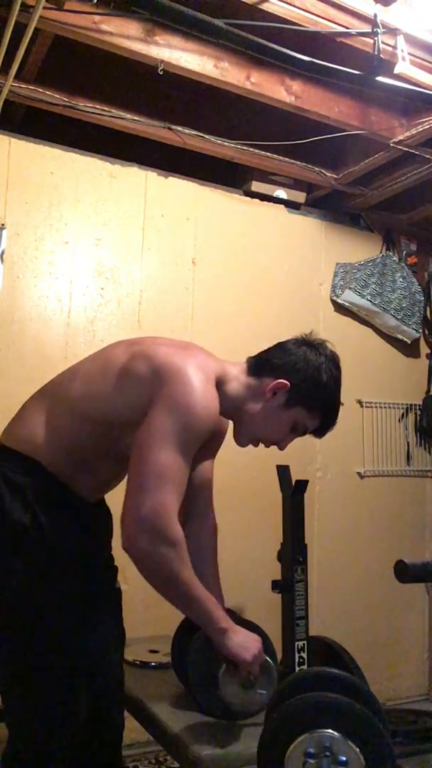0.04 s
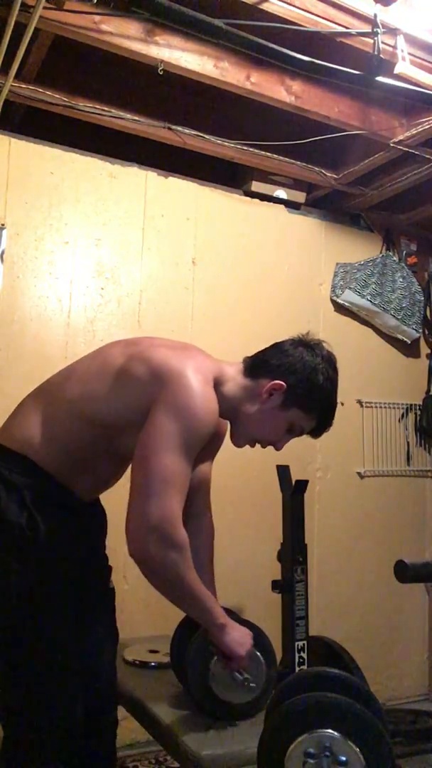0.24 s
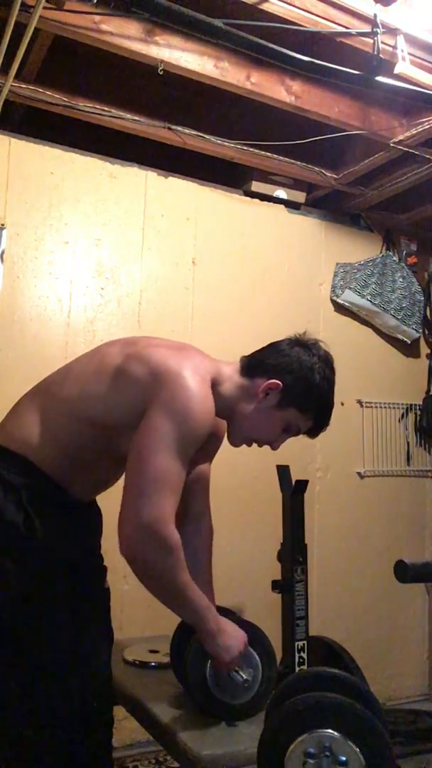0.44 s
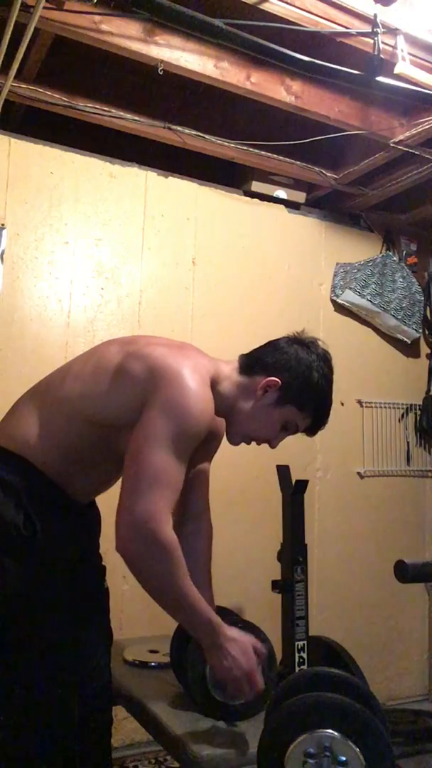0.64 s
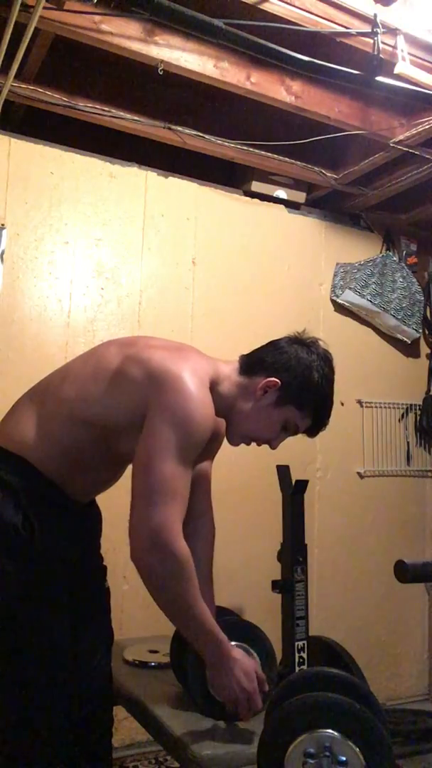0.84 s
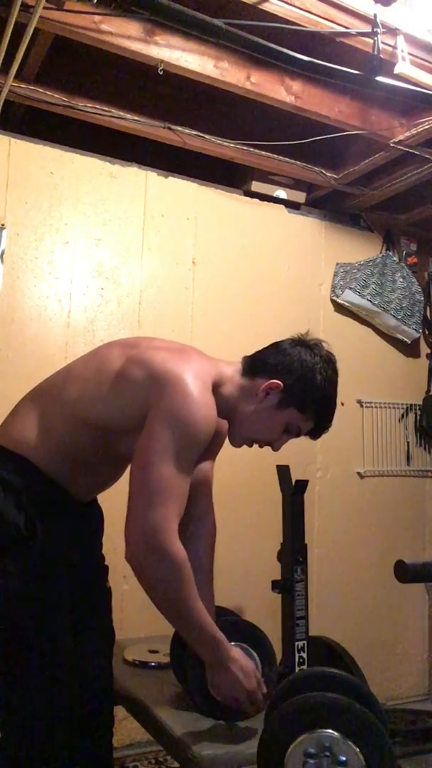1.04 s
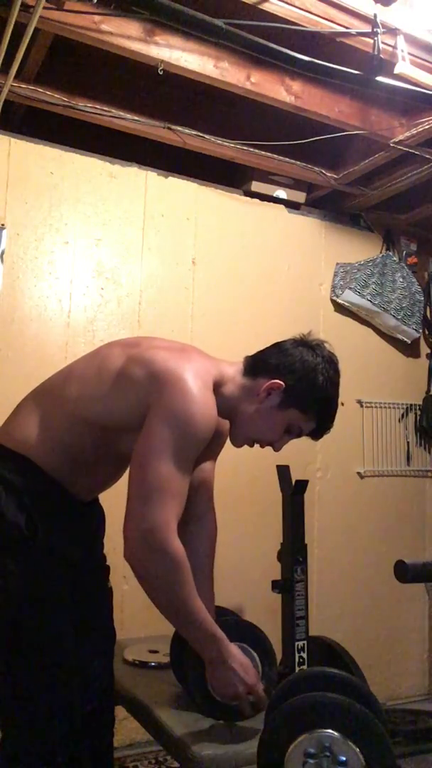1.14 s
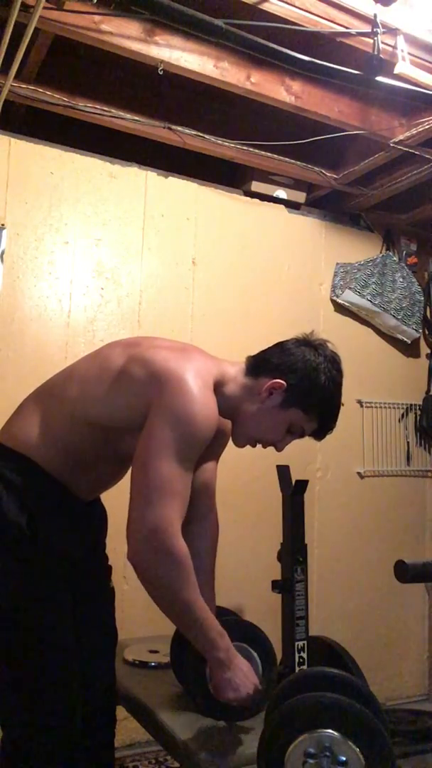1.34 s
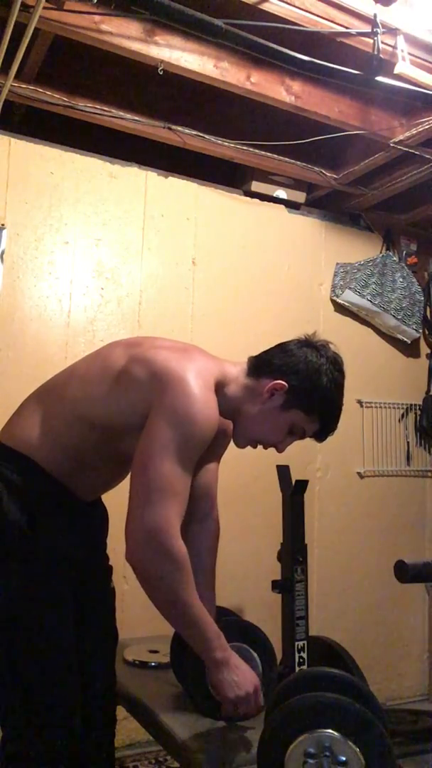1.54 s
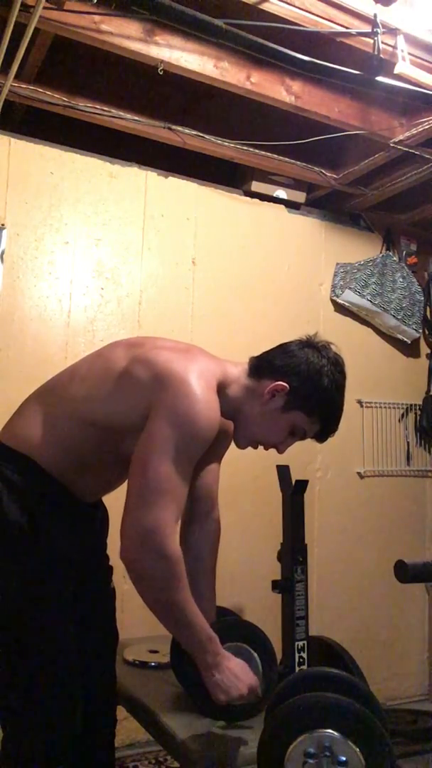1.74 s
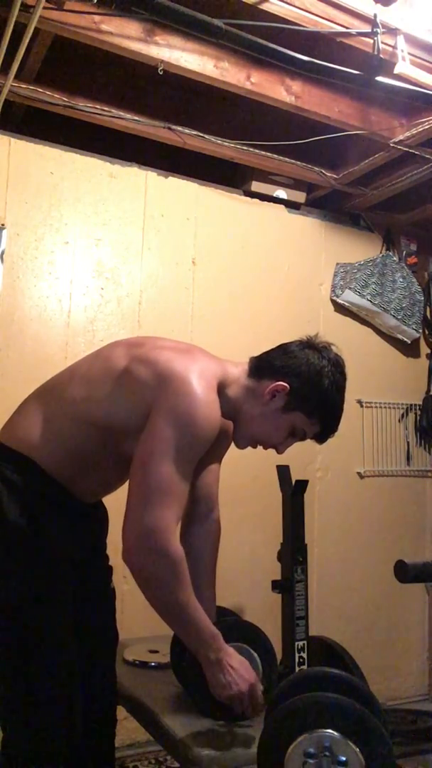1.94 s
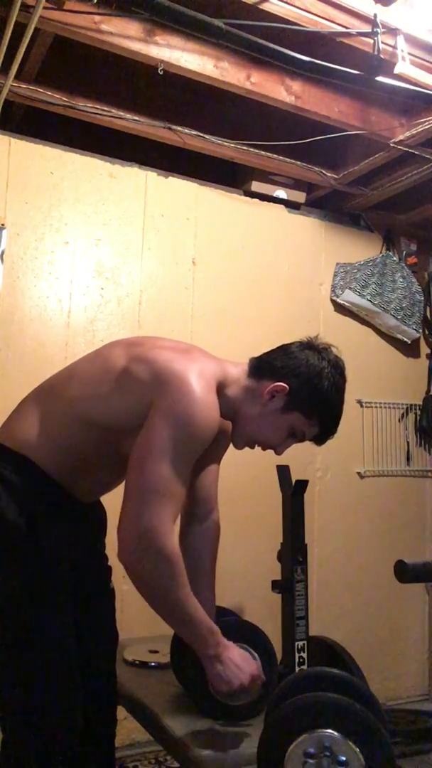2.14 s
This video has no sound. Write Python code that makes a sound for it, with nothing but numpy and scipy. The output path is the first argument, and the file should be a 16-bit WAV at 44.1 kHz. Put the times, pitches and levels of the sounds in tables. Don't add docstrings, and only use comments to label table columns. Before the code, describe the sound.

Metal plate clanking against other plates on a dumbbell, followed by faint collar ticks and scraping

```python
import sys
import numpy as np
from scipy import signal
from scipy.fft import rfft, irfft
from scipy.io import wavfile
from scipy.ndimage import uniform_filter1d, map_coordinates

SR = 44100
rng = np.random.default_rng(int(sys.argv[2]) if len(sys.argv) > 2 else 0)


def voltage_ratio(level):
    return 10 ** (np.asarray(level, float) / 20)


def generate_wav(sig):
    pcm = np.round(np.clip(np.atleast_2d(sig).T, -1, 1) * 32767).astype(np.int16)
    wavfile.write(sys.argv[1], SR, pcm)


N = 97020

# start in seconds, ring in dB, knock in dB, brightness in dB per octave.
GRIPPED_HITS = [
    (0.0657, -66, -55, -46),
    (0.1256, -58, -50.5, 0.5),
    (0.1412, -69, -40.5, -3.8),
    (0.167, -48, -42, -8.7),
    (.18, -41, -49, -5),
    (0.1995, -23.5, -21, -1.66),
    (0.299, -31.5, -20.5, -0.5),
    (0.343, -42, -37, -3.4),
    (0.384, -34.5, -48, 0.7),
]
# start in seconds, ring in dB, knock in dB, brightness in dB per octave.
FREE_HITS = [(.3945, -25, -12.5, -1), (.412, -20.5, -35.5, -8), (.432, -34, -22, 0.7),
             (.442, -25.5, -22, 4.2), (.4474, -19, -37.5, -3), (.462, -26, -32.5, 0), (.4908, -22, -51, -4),
             (.512, -31, -35.5, 3.1), (.519, -22.5, -13.5, 4.5), (.5277, -8.5, -21.5, -0.4),
             (.55, -30, -38.5, 9.6), (.5845, -18, -19.5, -2.2), (.6, -27.5, -44, -7.5),
             (.622, -25, -24.5, 1.8)]
# start in seconds, ring in dB, knock in dB, brightness in dB per octave.
COLLAR_HITS = [(.9133, -26.5, -28, 1), (1.1071, -74, -40.5, -13), (1.1683, -37, -32, 1.6),
               (1.197, -43, -33, -3.2), (1.217, -45, -40.5, -4.5), (1.3791, -60.5, -53.5, -6),
               (1.507, -52, -44, 2.5), (1.518, -39, -35.5, -0.5), (1.751, -50, -43, -7),
               (1.763, -40, -31, -1.5), (1.8113, -36.5, -32, -3.5), (1.8313, -41, -33, -2),
               (1.847, -44, -40.5, -14), (1.9095, -63.5, -38, -5), (1.992, -54, -39.5, -2),
               (2.012, -47, -39.5, -3.5), (2.073, -74, -54.5, .1), (2.1127, -30, -28, -1.5),
               (2.165, -33, -30.5, -1), (2.197, -34, -32.5, -10.7)]

# frequency in Hz, level in dB, t60 in seconds.
GRIPPED_MODES = [(2930, -5.5, 0.044), (3680, -10, .1), (4064, -18.5, 0.09), (4400, -10, 0.049),
                 (5862, -4.5, 0.18), (6940, -16, 0.076), (8495, -23, 0.031), (9440, -25.5, 0.071),
                 (11660, -35, 0.077), (11330, -27.5, .12), (11750, -24, 0.11)]
FREE_MODE_HZ = [1925, 3073, 3540, 3640, 3652, 4393, 5860, 5915, 6600, 8492, 10900, 11700, 14150, 15350]
# level in dB, t60 in seconds.
FREE_MODE_RING = [(-10.5, 0.34), (-14, 0.27), (-12, 0.012), (-2, 0.058), (-13.5, .3), (-23.5, .25),
                  (-18, 0.13), (-20.5, 0.17), (-27.5, 0.086), (-20.5, 0.073), (-41.5, 0.051), (-35, 0.051),
                  (-36.5, 0.088), (-50.5, .08)]
# frequency in Hz, level in dB, t60 in seconds.
COLLAR_MODES = [(1194, -12, 0.045), (1433, -30.5, 0.056), (1830, -14, 0.088), (2954, -4.5, 0.052),
                (3073, -7.5, 0.077), (3700, -12.5, 0.039), (6630, -7.5, 0.013), (7290, -12.5, 0.021),
                (9700, -24.5, 0.047), (10110, -21, 0.1), (11100, -33, .07), (12690, -40, .07),
                (15200, -34, 0.098)]

# frequency in Hz, level in dB, t60 in seconds.
GRIPPED_THUMP = [(500, -15.5, 0.0067), (1535, 3, 0.012), (1850, -5.5, 0.004)]
FREE_THUMP = [(678, -4, 0.011), (1550, -3.5, 0.013), (2300, -1.5, 0.0079)]
COLLAR_THUMP = [(670, -3.5, 0.0165), (1366, -3, .03), (2730, -9, 0.032)]
# shudder t60 in seconds, shudder in dB, crack in dB,
# choke of the old ring per new contact in dB.
CONTACT = [
    (0.087, -8, -3, -4),
    (0.043, -14, -5, -7.5),
    (0.07, -5.5, -34, -12.5),
]
# frequency in Hz, level in dB.
KNOCK_SPECTRUM = [(150, -45.5), (300, -14), (800, -7.5), (1400, -5), (3100, -4), (4500, -10.5),
                  (11500, -31), (13000, -44), (15900, -56)]

# time in seconds, level in dB.
SCRAPE_LEVEL = [(0.0, -65), (0.16, -49.5), (0.22, -45), (0.32, -44.5), (0.37, -42.5), (0.45, -53.5),
                (0.52, -66), (0.58, -77), (0.69, -58), (0.75, -78), (1.0, -60), (1.11, -62), (1.48, -60.5),
                (1.57, -58), (1.81, -83.5), (1.94, -54), (2.02, -51), (2.2, -57)]
# frequency in Hz, level in dB per Hz.
SCRAPE_SPECTRUM = [(150, -47.5), (250, -10), (308, -0.5), (428, 0.5), (918, -2), (1420, 0), (2300, -22),
                   (3620, -20.5), (15800, -45)]
# frequency in Hz, then level in dB.
SING_HZ = [3015, 10050]
SING_DB = [-13.5, -29.5]

# level in dB, t60 in seconds.
LEFTOVER_RING = (-51, 0.19)
# frequency in Hz, level in dB.
FURNACE_SPECTRUM = [(30, -24.5), (50, -14), (68, 2), (110, -13), (150, 1.5), (200, -13), (300, -22.5),
                    (1000, -30), (5000, -68), (20000, -120)]
# frequency in Hz, t60 in seconds.
ROOM_T60 = [(300, 0.23), (1500, 0.25), (4000, 0.23), (12000, 0.17)]
# time in seconds, level in dB.
HISS_LEVEL = [(0, -78), (.2, -92), (.4, -80), (.6, -75.5), (.9, -70), (.96, -83.5), (1.6, -87.5),
              (2.2, -85.5)]
# frequency in Hz, level in dB per Hz.
HISS_SPECTRUM = [(300, 0.5), (2000, 5.5), (6000, 2.5), (11000, 3.5), (16000, -6)]

RISE_S, PIVOT_HZ = 0.0006, 3120
SCATTER_DB, SCATTER_RAD = 1.5, 0.3
CRACK_T60_S, CRACK_DULL_HZ = 0.0097, 3240
SWELL_S = 0.0028
RING_ROOM_DB, ROOM_DB, ROOM_DELAY_S = -2.5, -1, 0.006
GRAINS_PER_S, GRAIN_SPREAD_DB, UNEVEN_DB = 3000, 3, 1.5
SING_FROM_S, SING_WIDTH_HZ = 0.91, 23
LEFTOVER_HZ = 3649
FURNACE_DB, FURNACE_SWAY_DB = -50.5, 0.5
HISS_DB = 5.5
LOW_CUT_HZ, TOP_HZ = 58, 15900


def unit(x):
    return x / np.sqrt(np.mean(x ** 2) + 1e-20)


def along(points, hz):
    f, v = np.transpose(points)
    return np.interp(np.log(hz + 1), np.log(f + 1), v)


def curve(rows):
    return np.interp(np.arange(N) / SR, *np.transpose(rows))


def coloured(x, spectrum):
    hz = np.fft.rfftfreq(len(x), 1 / SR)
    gain = voltage_ratio(along([(10, -120)] + list(spectrum), hz))
    return unit(irfft(rfft(x) * gain, len(x)))


def wobble(knots_per_s):
    knots = rng.standard_normal(int(N * knots_per_s / SR) + 4)
    return map_coordinates(knots, [np.arange(N) * knots_per_s / SR])


def room(x, wet_db=ROOM_DB):
    hz, t, z = signal.stft(rng.standard_normal(SR // 2), SR, nperseg=256)
    decay = voltage_ratio(-60 * t / along(ROOM_T60, hz)[:, None])
    tail = signal.istft(z * decay, SR, nperseg=256)[1]
    tail = np.pad(tail / np.linalg.norm(tail), (int(ROOM_DELAY_S * SR), 0))
    return x + voltage_ratio(wet_db) * signal.fftconvolve(x, tail)[:len(x)]


def ringing(modes, bright_db, t):
    hz, level_db, t60_s = np.transpose(modes)[:, :, None]
    chance = rng.standard_normal((2, len(modes), 1))
    start_db = level_db + bright_db * np.log2(hz / PIVOT_HZ) + SCATTER_DB * chance[0]
    tones = np.sin(2 * np.pi * hz * t + SCATTER_RAD * chance[1])
    return (voltage_ratio(start_db - 60 * t / t60_s) * tones).sum(0) * (1 - np.exp(-t / RISE_S))


def blows(hits, modes, thump_modes, shudder_t60_s, shudder_db, crack_db, choke_db):
    out = np.zeros(N + SR)
    t = np.arange(SR // 2) / SR
    soften = signal.butter(2, min(CRACK_DULL_HZ, SR / 3), fs=SR)
    times = np.transpose(hits)[0]
    for start_s, ring_db, knock_db, bright_db in hits:
        later_contacts = np.searchsorted(times[times > start_s], start_s + t)
        choke = uniform_filter1d(voltage_ratio(choke_db * later_contacts), size=60)
        ring = ringing(modes, bright_db, t) * choke

        spectrum = [(hz, db + bright_db * np.log2(hz / PIVOT_HZ)) for hz, db in KNOCK_SPECTRUM]
        noise = coloured(rng.standard_normal(len(t)), spectrum)
        crack = noise * voltage_ratio(crack_db - 60 * t / CRACK_T60_S) * (1 - np.exp(-t / RISE_S))
        crack = signal.lfilter(*soften, crack)
        thump = ringing(thump_modes, 0, t)
        shudder = noise * voltage_ratio(shudder_db - 60 * t / shudder_t60_s) * (1 - np.exp(-t / SWELL_S))
        knock = crack + thump + shudder

        blow = voltage_ratio(ring_db) * room(ring, RING_ROOM_DB) + voltage_ratio(knock_db) * room(knock)
        out[round(start_s * SR):][:len(t)] += blow
    return out[:N]


def scrape():
    struck = rng.random(N) < GRAINS_PER_S / SR
    grains = struck * voltage_ratio(GRAIN_SPREAD_DB * rng.standard_normal(N)) * rng.standard_normal(N)
    sing = np.zeros(N)
    for hz, db in zip(SING_HZ, SING_DB):
        resonance = signal.iirpeak(hz, hz / SING_WIDTH_HZ, SR)
        sing += voltage_ratio(db) * unit(signal.lfilter(*resonance, grains))
    sing *= np.arange(N) > SING_FROM_S * SR
    rub = unit(room(coloured(grains, SCRAPE_SPECTRUM)))
    return voltage_ratio(curve(SCRAPE_LEVEL) + UNEVEN_DB * wobble(25)) * (rub + sing)


def leftover():
    t = np.arange(N) / SR
    level_db, t60_s = LEFTOVER_RING
    return voltage_ratio(level_db - 60 * t / t60_s) * np.sin(2 * np.pi * LEFTOVER_HZ * t)


def furnace():
    level_db = FURNACE_DB + FURNACE_SWAY_DB * wobble(5.59)
    return voltage_ratio(level_db) * coloured(rng.standard_normal(N), FURNACE_SPECTRUM)


def hiss():
    return voltage_ratio(curve(HISS_LEVEL) + HISS_DB) * coloured(rng.standard_normal(N), HISS_SPECTRUM)


def scene():
    free_modes = np.column_stack([FREE_MODE_HZ, FREE_MODE_RING])
    metal = blows(GRIPPED_HITS, GRIPPED_MODES, GRIPPED_THUMP, *CONTACT[0])
    metal += blows(FREE_HITS, free_modes, FREE_THUMP, *CONTACT[1])
    metal += blows(COLLAR_HITS, COLLAR_MODES, COLLAR_THUMP, *CONTACT[2])
    return (metal + scrape() + leftover() + furnace())[None]


def roll_off(x):
    return signal.sosfilt(signal.butter(12, 16200, fs=SR, output="sos"), x)


def record(dry):
    hz = np.fft.rfftfreq(N, 1 / SR)
    low_cut = 1 / np.sqrt(1 + (LOW_CUT_HZ / (hz + 1)) ** 6)
    mix = irfft(rfft(dry + hiss()) * (hz < TOP_HZ) * low_cut, N)
    return roll_off(mix)


dry = scene()
out = record(dry)
generate_wav(out)
```